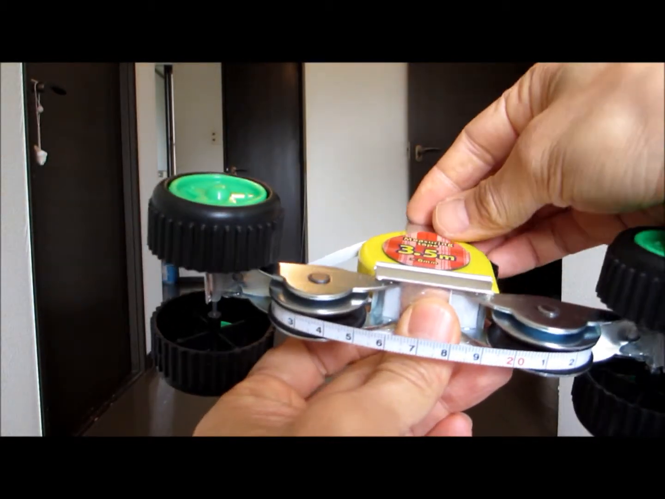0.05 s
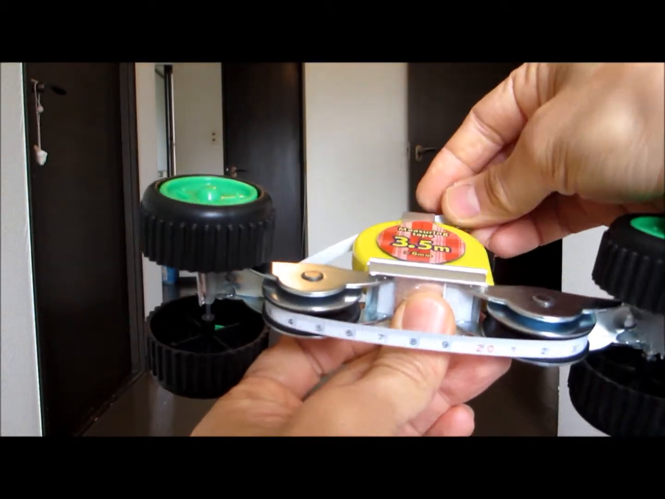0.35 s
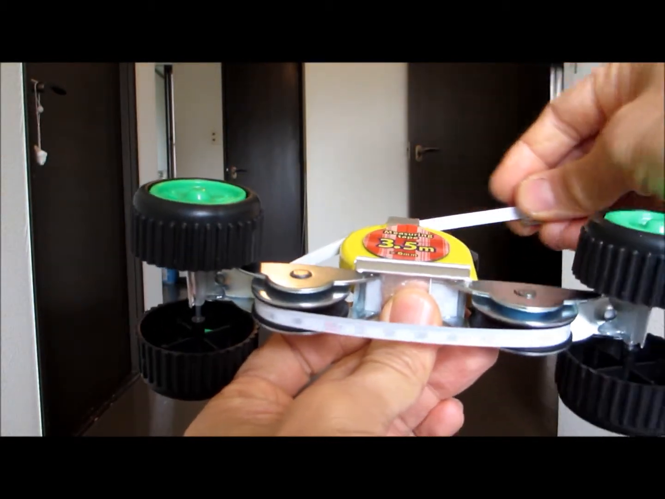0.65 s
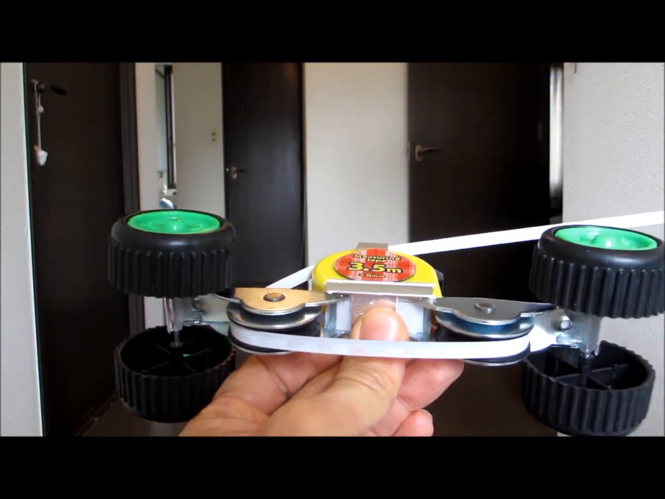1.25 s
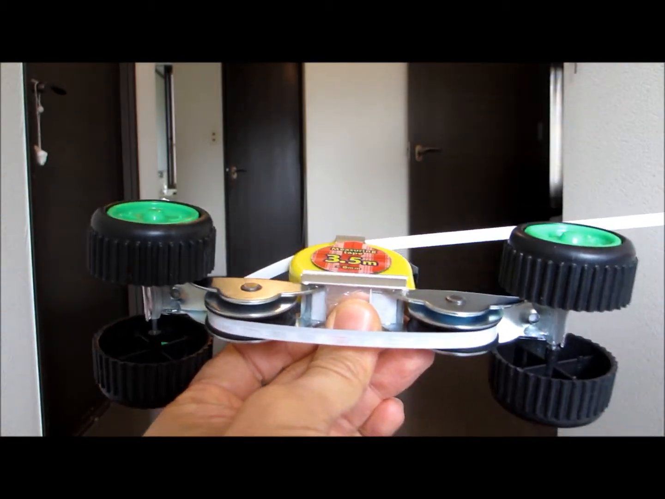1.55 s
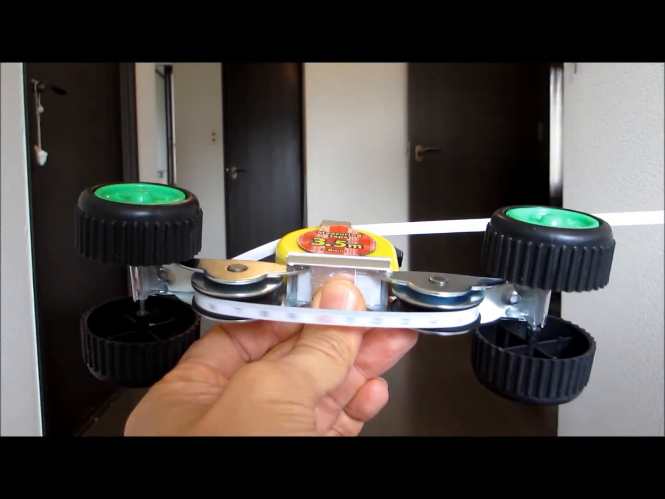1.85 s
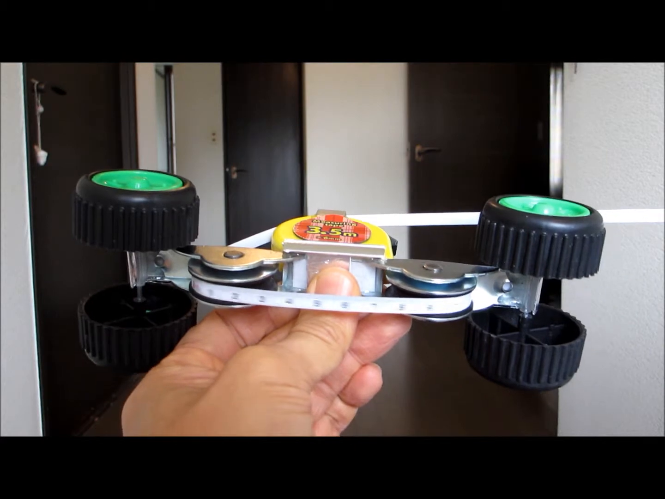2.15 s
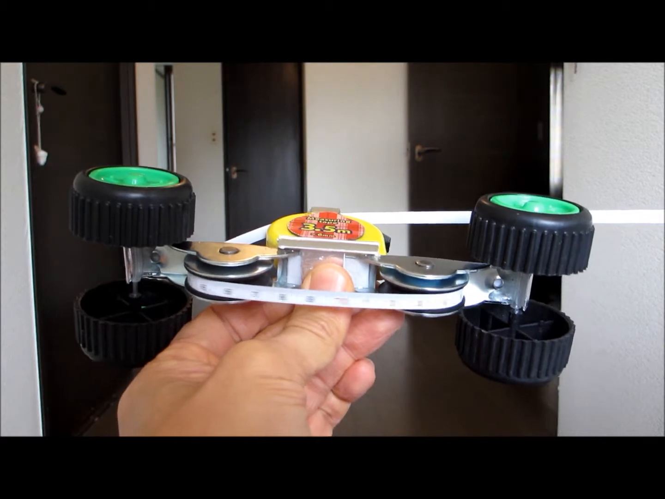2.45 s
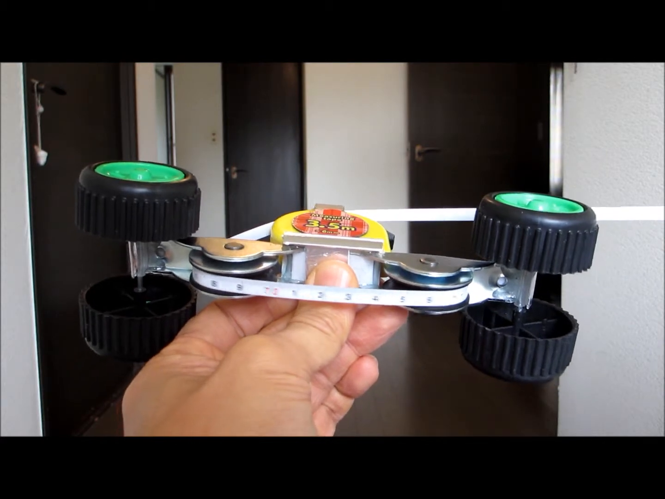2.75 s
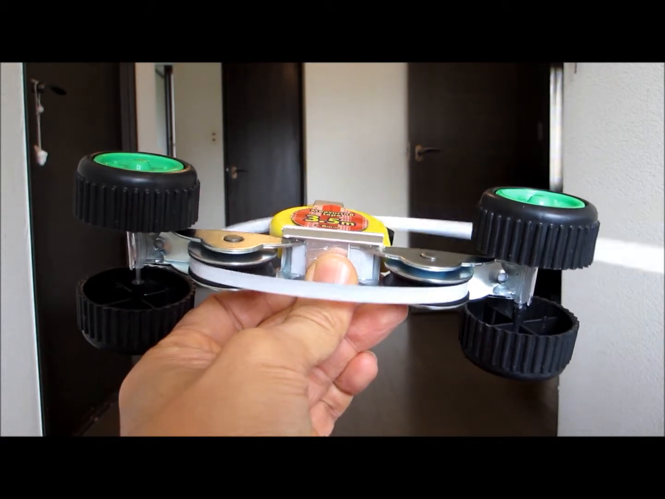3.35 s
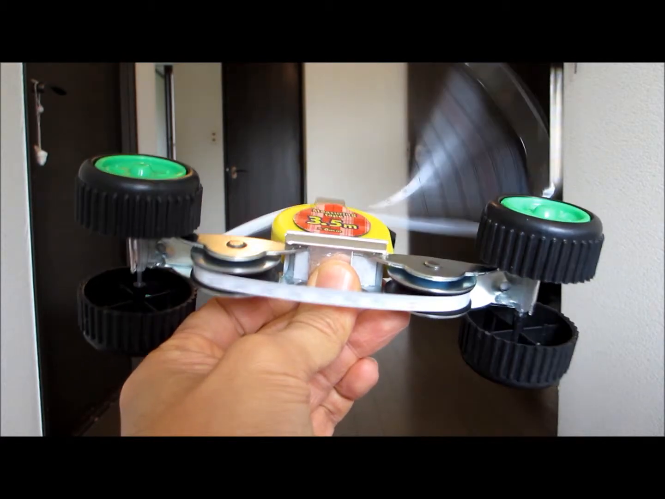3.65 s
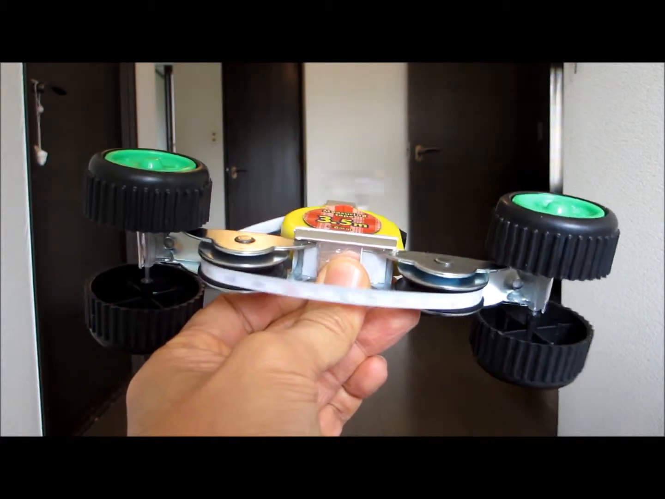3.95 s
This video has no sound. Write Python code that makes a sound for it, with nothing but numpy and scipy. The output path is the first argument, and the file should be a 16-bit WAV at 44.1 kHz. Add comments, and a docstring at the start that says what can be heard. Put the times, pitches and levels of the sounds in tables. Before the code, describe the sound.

A steel tape measure is drawn out slowly with a soft, uneven hiss and small clicks. After a brief lull it rewinds, whirring and rattling as the blade slaps against metal guides, heard close up in a small room.

```python
"""Tape measure drawn out and let go

A steel tape measure on a hand-held toy chassis with pulleys is drawn out slowly in a small room.
Sliding friction makes the blade hiss and the reel rumble in its resonant plastic case. As the spring
winds it back, both swell to a whirring rattle and the whipping blade slaps the guides.
Two close microphones receive the bass out of phase."""
import sys
import numpy as np
from scipy import signal
from scipy.fft import rfft, irfft
from scipy.io import wavfile

SR = 44100
rng = np.random.default_rng(int(sys.argv[2]) if len(sys.argv) > 2 else 0)


def output_pcm(signal):
    """Save a mono or channel-first signal as 16-bit PCM at the path in sys.argv[1].

    Samples are clipped to [-1, 1] before scaling.
    """
    pcm = np.clip(np.atleast_2d(signal).T, -1, 1) * 32767
    wavfile.write(sys.argv[1], SR, np.round(pcm).astype(np.int16))


N = 176400
TIME = np.arange(N) / SR
FREQS = np.fft.rfftfreq(N, 1 / SR)


def amp(db):
    """Amplitude ratio of a level in decibels."""
    return 10 ** (np.asarray(db) / 20)


def unit(x):
    """Normalisation to rms 1."""
    return x / np.sqrt(np.mean(x ** 2) + 1e-20)


def read(points, hz, column=1):
    """Interpolation of a table column along log frequency."""
    table = np.transpose(points)
    return np.interp(np.log(hz + 1), np.log(table[0] + 1), table[column])


def add(mix, start_s, sound):
    """Superposition of a sound onto the mix."""
    part = mix[max(round(start_s * SR), 0):][:len(sound)]
    part += sound[:len(part)]


def response(spectrum, size=4096):
    """Minimum-phase impulse response of energy 1 with a given spectral shape."""
    log_gain = np.log(amp(read(spectrum, abs(np.fft.fftfreq(size, 1 / SR)))))
    impulse = np.fft.ifft(np.exp(np.conj(signal.hilbert(log_gain)))).real[:size // 2]
    return impulse / np.linalg.norm(impulse)


def through(x, impulse):
    """Convolution with an impulse response."""
    return signal.fftconvolve(x, impulse)[:N]


def wander(hz):
    """Random modulation: low-passed noise of rms 1."""
    return unit(irfft(rfft(rng.standard_normal(N)) / (1 + (FREQS / hz) ** 4), N))


def microphones(right, other, pair):
    """Partial coherence: the left channel blends the right with another signal, scaled and phase-shifted."""
    shared = np.clip(read(pair, FREQS, column=3), 0, 1)
    blend = shared * rfft(right) + (1 - shared) * rfft(other)
    left = blend * amp(read(pair, FREQS)) * np.exp(1j * read(pair, FREQS, column=2))
    return np.array([irfft(left, N), right])


# Background spectrum (frequency [Hz], relative density [dB])
AIR_SPECTRUM = [(20, 2), (42, -4), (120, -5), (200, -8.5), (350, -11.5), (660, -17.5), (1400, -20.5),
                (2300, -40), (4000, -51.5), (16000, -51)]
# Background, left against right (frequency [Hz], level [dB], phase lead [rad], shared part [0-1])
AIR_STEREO = [(64, -0.25, 3.55, 0.82), (1010, 0.4, 2.67, 0.65), (2960, 0.83, 2.55, 0.096),
              (10000, 0.26, 2.7, 0.086)]
def air(level_db=-41.5):
    """Ambient noise: the steady low rush of the room."""
    colour = amp(read(AIR_SPECTRUM, FREQS))
    noises = rng.standard_normal((2, N))
    right, other = (amp(level_db) * unit(irfft(rfft(noise) * colour, N)) for noise in noises)
    return microphones(right, other, AIR_STEREO)


# Rumble of the hands, right channel (time [s], level [dB])
GRIP_LEVELS = [(0, -54.5), (.7, -42.5), (1.2, -49), (1.9, -60)]
def handling(centre_hz=65, width_hz=25):
    """Structure-borne noise: hands shifting on the chassis rumble, weaker and in antiphase on the left."""
    colour = 1 / (1 + ((FREQS - centre_hz) / width_hz) ** 2)
    rumble = unit(irfft(rfft(rng.standard_normal(N)) * colour, N))
    envelope = amp(np.interp(TIME, *np.transpose(GRIP_LEVELS)))
    return rumble * envelope * np.array([[-.4], [1]])


# Reverberation of the room (frequency [Hz], T60 [s])
ROOM_DECAY = [(150, 0.23), (3000, 0.32), (8000, 0.23), (15000, 0.093)]
def reflections(first_s=0.0019):
    """Diffuse field: dense echoes of energy 1, each band decaying exponentially at its own rate."""
    t = np.arange(SR // 2) / SR
    echoes = rng.standard_normal(len(t)) * (t > first_s)
    hz, age_s, bands = signal.stft(echoes, SR, nperseg=256)
    decay = amp(-60 * age_s / read(ROOM_DECAY, hz)[:, None])
    tail = signal.istft(bands * decay, SR, nperseg=256)[1]
    return tail / np.linalg.norm(tail)


def room(x, wet_db, shift_hz=25, paths=4):
    """Multipath propagation: direct sound plus echoes whose paths shift as the blade moves."""
    shares = np.array([wander(shift_hz) for _ in range(paths)])
    shares /= np.linalg.norm(shares, axis=0)
    return x + amp(wet_db) * sum(through(x * share, reflections()) for share in shares)


# Modes of the case (frequency [Hz], relative level [dB], T60 [s])
CASE_MODES = [(910, -11, 0.036), (1035.5, -5.5, 0.08), (1188.6, 8, 0.043), (1418, -9, 0.072),
              (1494.5, 0, 0.048), (1698, -5.5, 0.034), (2468, -12.5, 0.092), (2880, -19, 0.054),
              (3565, -17.5, 0.11)]
# Broad response of the case (frequency [Hz], relative density [dB])
KNOCK_SPECTRUM = [(50, -13), (110, -8), (330, -2.5), (600, -0.5), (1100, 4.5), (1700, -4.5), (2300, -6.5),
                  (3100, -8), (4000, -24.5), (10000, -45)]
def case(ring_db, damping_hz=3780):
    """Modal resonance: the case answers an impulse with a dull knock and ringing whose treble is damped."""
    t = np.arange(SR // 4) / SR
    ring = sum(amp(db - 60 * t / t60) * np.cos(2 * np.pi * hz * t) for hz, db, t60 in CASE_MODES)
    ring = signal.sosfilt(signal.butter(2, damping_hz, fs=SR, output="sos"), ring)
    impulse = amp(ring_db) * ring / np.linalg.norm(ring)
    add(impulse, 0, response(KNOCK_SPECTRUM))
    return impulse / np.linalg.norm(impulse)


def waver(x, depth_ms=.4, rate_hz=12):
    """Frequency modulation: the case's resonances slide as the blade presses in changing places."""
    return np.interp(TIME + depth_ms / 1000 * wander(rate_hz), TIME, x)


def friction(per_s, spread_db, smooth_db, flutter_db, flutter_hz):
    """Sliding friction: tiny uneven catches over smooth rubbing, under fluttering contact pressure."""
    sizes = amp(spread_db * np.minimum(rng.exponential(1, N), 4)) * rng.choice([-1., 1.], N)
    catches = unit(sizes * (rng.random(N) < per_s / SR))
    rubbing = amp(smooth_db) * rng.standard_normal(N)
    pressure = amp(flutter_db * wander(flutter_hz))
    return unit((catches + rubbing) * pressure)


def contact(decay_ms):
    """Contact transient: a burst of chatter with a quick rise and exponential decay."""
    age = np.arange(SR // 20) / SR * 1000 / decay_ms  # in time constants
    return rng.standard_normal(len(age)) * (1 - np.exp(-age / 0.11)) * np.exp(-age)


def rasp(x, band_hz=(1900, 3700)):
    """Band-pass filtering gives the hard middle register of the blade's edge on a guide."""
    return signal.sosfilt(signal.butter(2, band_hz, "bandpass", fs=SR, output="sos"), x)


# The struck blade (frequency [Hz], relative density [dB])
CLASH_SPECTRUM = [(500, -36), (2500, -12.5), (4200, -6), (5600, -0.5), (6700, -6), (8200, 2), (11000, 10),
                  (13000, 8), (16000, 0.5)]
def struck_steel(force):
    """Forced response: the thin blade radiates a blow mostly as high treble."""
    return through(force, response(CLASH_SPECTRUM))


# Ticks during the pull (time [s], relative level [dB])
BLADE_TICKS = [(0.0179, -45.5), (0.165, -50), (0.2109, -44), (0.377, -51), (0.4254, -53), (0.6599, -42),
               (0.83, -41), (1.0002, -35.5), (1.452, -35)]
def ticks(gain_db=-4, decay_ms=1.0):
    """Light impacts: the blade ticks against its slot."""
    force = np.zeros(N)
    for start_s, db in BLADE_TICKS:
        add(force, start_s, amp(db + gain_db) * contact(decay_ms))
    return struck_steel(force)


def squeak(start_s=0.52, length_s=0.054, hz=2490, width_hz=130, level_db=-58):
    """Stick-slip: the blade squeaks faintly, in a narrow band of noise, as it starts to slide."""
    t = np.arange(0, length_s, 1 / SR)
    phase = 2 * np.pi * hz * t
    tone = wander(width_hz)[:len(t)] * np.sin(phase) + wander(width_hz)[:len(t)] * np.cos(phase)
    sound = np.zeros(N)
    add(sound, start_s, amp(level_db) * unit(tone * np.hanning(len(t))))
    return sound


# Effort of the pulling hand (time [s], relative level [dB])
PULL_EFFORT = [(0, -76), (.44, -63), (.5, -60), (.56, -56.5), (.625, -57.5), (.68, -55.5), (.92, -53.5),
               (1.0, -51), (1.13, -52.5), (1.18, -49), (1.29, -48.5), (1.37, -53.5), (1.47, -48.5),
               (1.78, -51.5), (1.88, -56), (2.08, -57.5), (2.25, -61), (2.45, -57), (2.69, -67.5),
               (2.9, -55.5), (3.06, -70), (3.2, -74.5), (3.27, -55)]
# Catches of the reel (time [s], relative reel level [dB], relative edge level [dB], decay [ms])
REEL_CATCHES = [(.497, -50.5, -65, 9.5), (0.721, -46.5, -56, 2.8), (.83, -52, -50, 5),
                (.853, -47, -57, 4.2), (.977, -44, -60, 7.7), (1.003, -57, -47.5, 15),
                (1.191, -63, -33, 4.5), (1.273, -46.5, -64, 20), (1.441, -49.5, -54, 21)]
# The slowly sliding blade (frequency [Hz], relative density [dB])
SLOW_HISS_SPECTRUM = [(500, -12), (3100, -6), (4100, -11), (5500, -6.5), (7000, -12), (8800, -6.5),
                      (10500, -1), (12200, -2.5), (14000, -5.5), (16000, -12.5)]
def pull(hiss_gain_db=-6.5, hiss_growth=1.25, usual_effort_db=-52, catch_gain_db=9):
    """Friction noise grows with effort: the reel rumbles and catches, the blade hisses and rasps."""
    effort_db = np.interp(TIME, *np.transpose(PULL_EFFORT), right=-120)
    reel = friction(per_s=500, spread_db=1.5, smooth_db=2.0, flutter_db=2.5, flutter_hz=36.2)
    reel *= amp(effort_db + 5.5)
    edge = np.zeros(N)
    for start_s, reel_db, edge_db, decay_ms in REEL_CATCHES:
        add(reel, start_s, amp(reel_db + catch_gain_db) * contact(decay_ms))
        add(edge, start_s, amp(edge_db + catch_gain_db) * contact(decay_ms))
    hiss = friction(per_s=1100, spread_db=11.0, smooth_db=4.0, flutter_db=0.6, flutter_hz=31)
    hiss *= amp(usual_effort_db + hiss_growth * (effort_db - usual_effort_db) + hiss_gain_db)
    rumble = waver(through(reel, case(ring_db=3.5)))
    return rumble + rasp(edge) + through(hiss, response(SLOW_HISS_SPECTRUM))


# Course of the return (time [s], relative reel level [dB], relative hiss level [dB])
REWIND_LEVELS = [(3.265, -59, -73), (3.29, -50.5, -60), (3.345, -51.5, -52.5), (3.36, -43.5, -45),
                 (3.42, -42, -50), (3.51, -39.5, -46), (3.555, -39.5, -38.5), (3.61, -36, -41),
                 (3.7, -35.5, -39.5), (3.745, -43.5, -45), (3.79, -45, -45), (3.85, -41.5, -45.5),
                 (3.93, -41, -39), (4.0, -52, -55)]
# The racing blade (frequency [Hz], relative density [dB])
FAST_HISS_SPECTRUM = [(500, -12.5), (2500, -8.5), (4200, -10.5), (5600, -12), (6700, -14), (8000, -11),
                      (9300, -9), (10800, -2), (12300, -5), (13800, -5), (16000, -14.5)]
def rewind():
    """Friction at speed: the spring-driven reel chatters in the case as the blade races over the guides."""
    times, reel_db, hiss_db = np.transpose(REWIND_LEVELS)
    reel = friction(per_s=500, spread_db=2.0, smooth_db=-3.5, flutter_db=2.6, flutter_hz=112)
    reel *= amp(np.interp(TIME, times, reel_db, left=-120) + 5)
    hiss = friction(per_s=1700, spread_db=1.5, smooth_db=-6.5, flutter_db=3.0, flutter_hz=150)
    hiss *= amp(np.interp(TIME, times, hiss_db, left=-120) + 5.5)
    return through(reel, case(ring_db=-6)) + through(hiss, response(FAST_HISS_SPECTRUM))


# Blows of the blade on case and guides
# (time [s], relative steel level [dB], relative case level [dB], contact decay [ms], scrape rise [ms])
BLADE_SLAPS = [(1.161, -39, -37, 1.7, .5), (1.1918, -22, -47, 2, 3), (3.313, -52, -42.5, 4.9, 1),
               (3.468, -31, -32, 2, .5), (3.495, -11, -25, 1.5, .1), (3.524, -20.5, -27, 14, .3),
               (3.555, -14, -36, 4, 1.7), (3.575, -11.5, -29.5, 2.8, 2.9), (3.643, -20, -29.5, 7.7, 1),
               (3.701, -9.5, -27.5, 2.3, 12), (3.7157, -4.5, -19, 1.5, 3.5), (3.728, -16, -49, 1.2, 0.92),
               (3.8057, -19, -29, 2.7, .3), (3.830, -8, -23, 1.9, 6.3), (3.871, -15.5, -35, 2, .5),
               (3.9129, -24, -23.5, 2.7, .3)]
def slaps(clash_db=-4, snap_db=8.0, crack_db=7, crack_ms=0.6, knock_db=27, scrape_db=-8, rattle_db=-24):
    """Impact excitation: the blade scrapes in, snaps and clashes; the case cracks, knocks and rattles."""
    steel, edge, blows = np.zeros((3, N))
    for hit_s, steel_db, case_db, contact_ms, rise_ms in BLADE_SLAPS:
        scrape = amp(scrape_db) * contact(rise_ms)[::-1]  # swells into the hit
        clash = np.concatenate([scrape, contact(contact_ms)])
        add(steel, hit_s - len(scrape) / SR, amp(steel_db + clash_db) * clash)
        add(steel, hit_s, amp([steel_db + snap_db]) / contact_ms)  # shorter contact, harder snap
        add(edge, hit_s, amp(case_db + crack_db) * contact(crack_ms))
        add(blows, hit_s, amp([case_db + knock_db]))
        add(blows, hit_s, amp(case_db + knock_db + rattle_db) * contact(contact_ms))
    return struck_steel(steel) + rasp(edge) + through(blows, case(ring_db=9))


# Tape measure, left against right (frequency [Hz], level [dB], phase lead [rad], shared part [0-1])
TAPE_STEREO = [(60.3, 1.5, 1.68, 1), (296, -3.5, 2.36, 0.52), (740, -6, 2.62, 0.43),
               (1210, -10, 2.29, 0.93), (2100, -7, 1.92, 0.12), (3100, -9.5, 1.7, 0.08),
               (5700, -8, 0.46, 0.1), (9600, -12, 0.99, 0.2), (14600, -7.5, 1.3, 0)]
def scene():
    """Direct and reverberant sound: the tape measure is on the right; the left hears more of the room."""
    tape = pull() + squeak() + rewind() + slaps() + ticks()
    near = room(tape, wet_db=-3.5)
    far = amp(-2.5) * room(tape, wet_db=1.0)
    return microphones(near, far, TAPE_STEREO) + air() + handling()


def record(dry, cutoff_hz=16050):
    """Band limiting by a steep linear-phase low-pass filter."""
    lowpass = signal.firwin(511, cutoff_hz, window=("kaiser", 9), fs=SR)
    return signal.oaconvolve(dry, lowpass[None], "same")


dry = scene()
out = record(dry)
output_pcm(out)
```